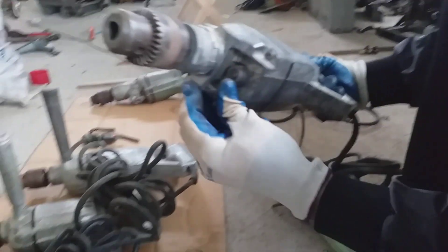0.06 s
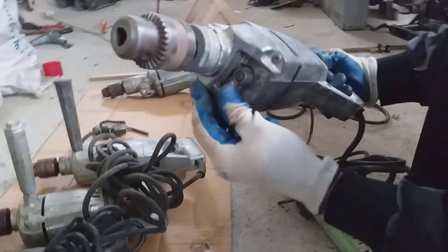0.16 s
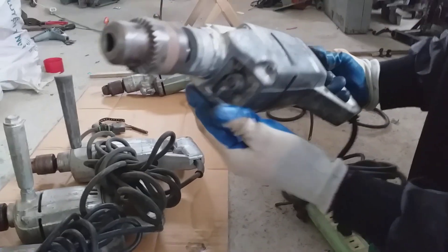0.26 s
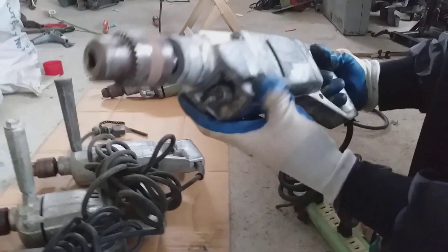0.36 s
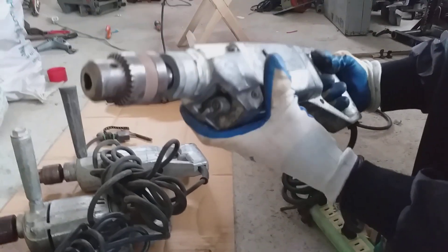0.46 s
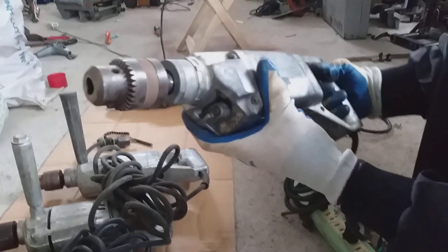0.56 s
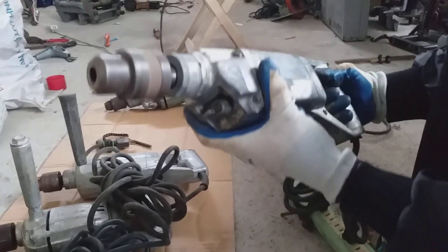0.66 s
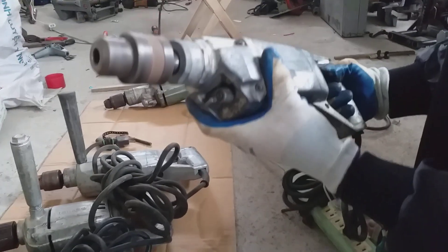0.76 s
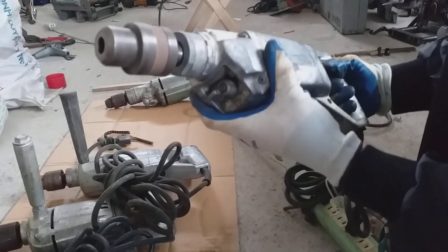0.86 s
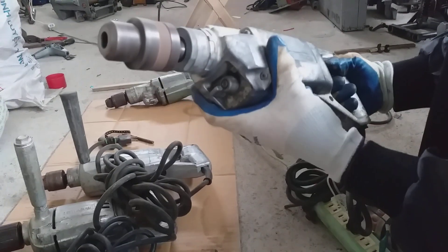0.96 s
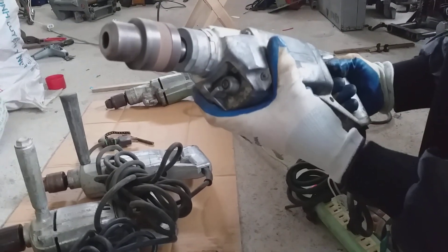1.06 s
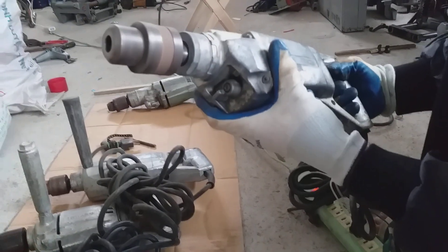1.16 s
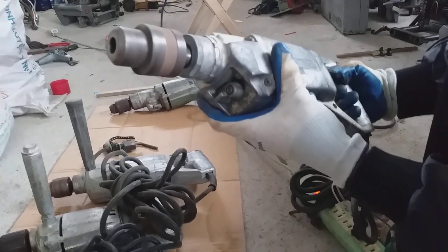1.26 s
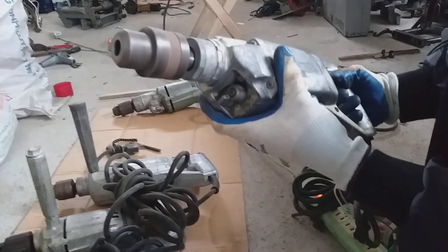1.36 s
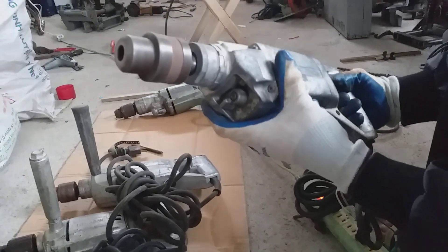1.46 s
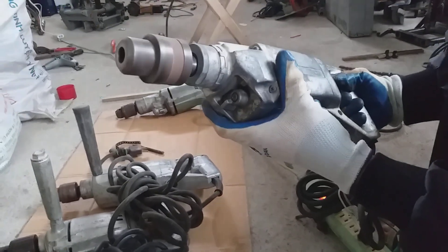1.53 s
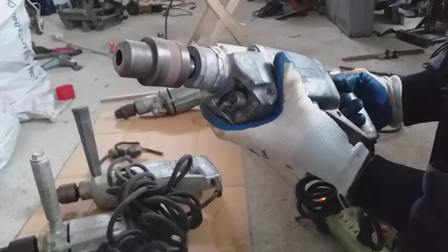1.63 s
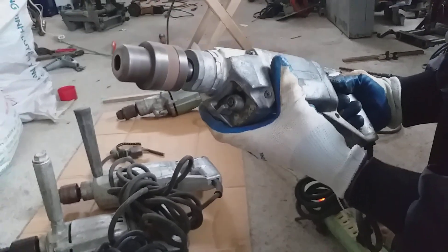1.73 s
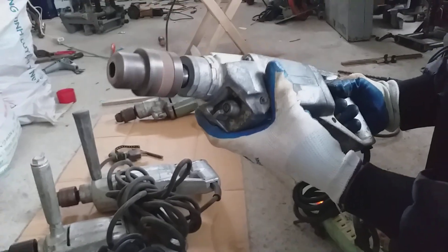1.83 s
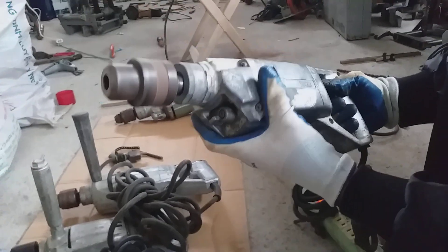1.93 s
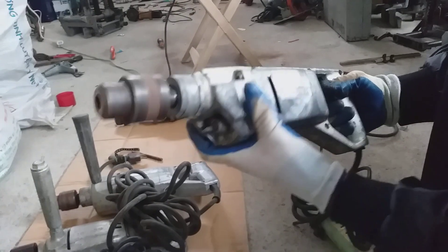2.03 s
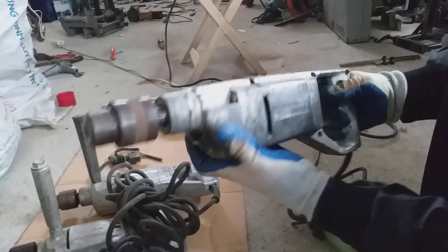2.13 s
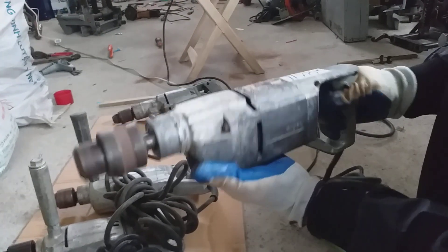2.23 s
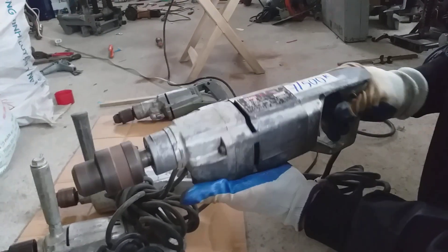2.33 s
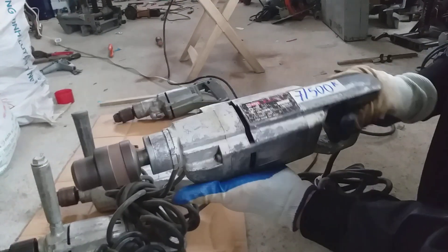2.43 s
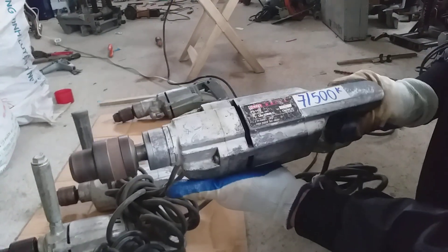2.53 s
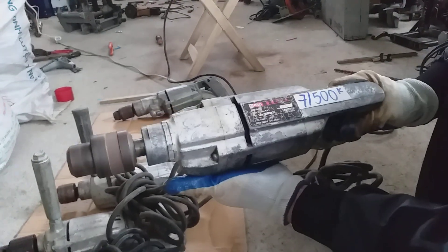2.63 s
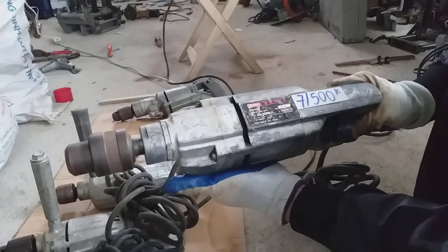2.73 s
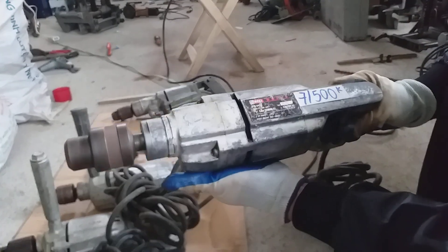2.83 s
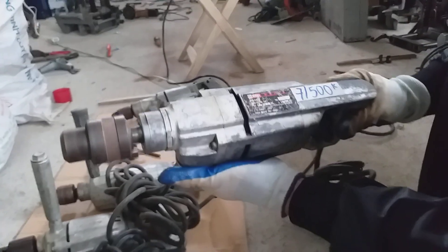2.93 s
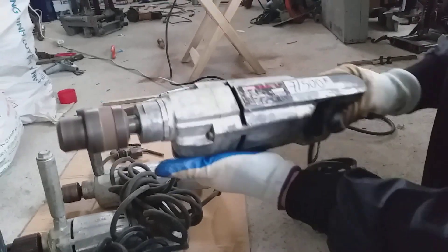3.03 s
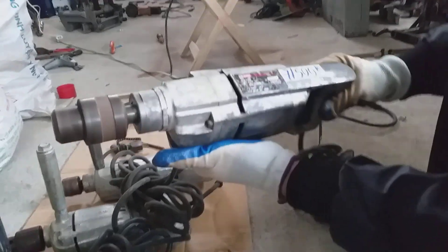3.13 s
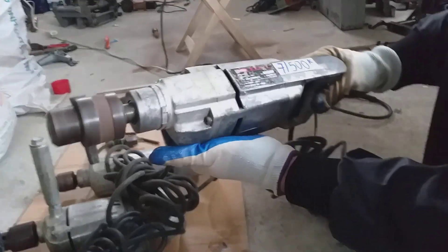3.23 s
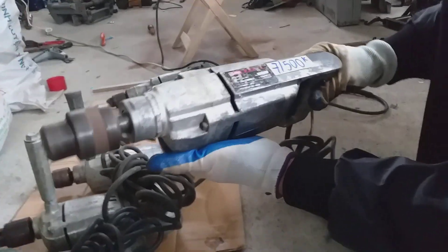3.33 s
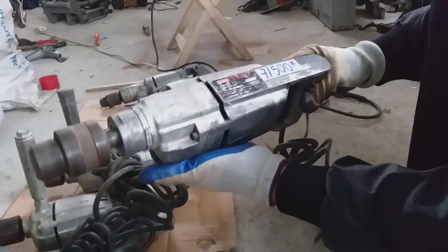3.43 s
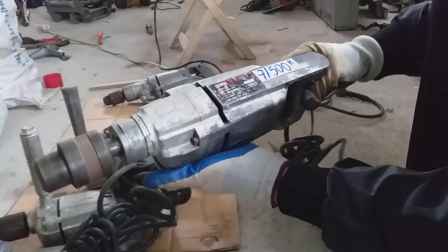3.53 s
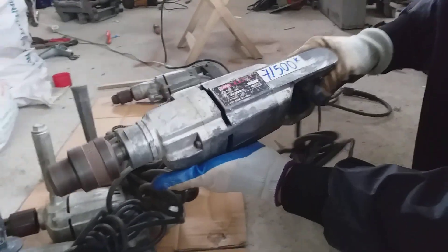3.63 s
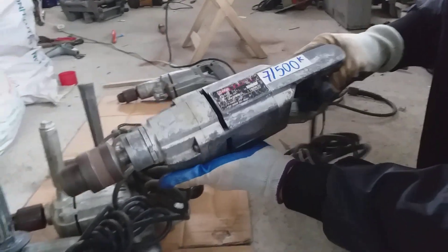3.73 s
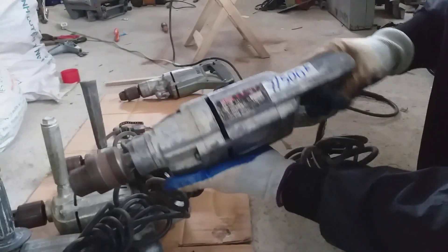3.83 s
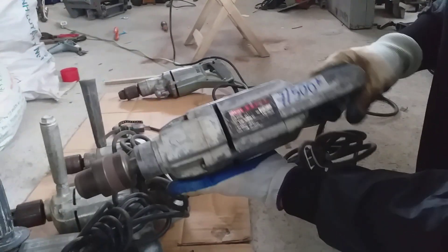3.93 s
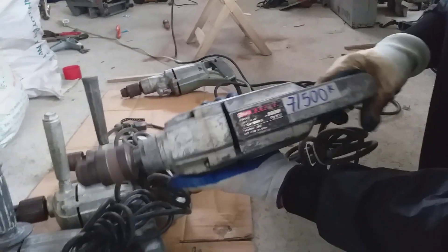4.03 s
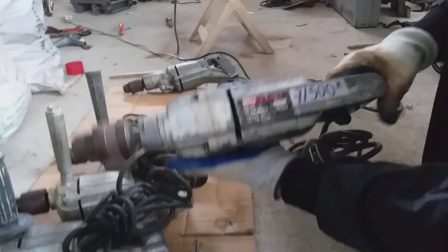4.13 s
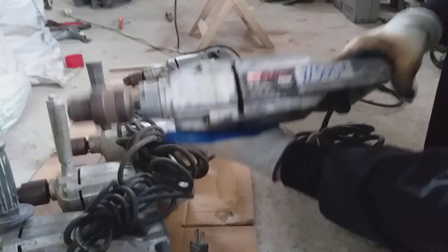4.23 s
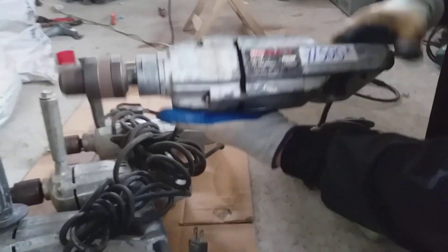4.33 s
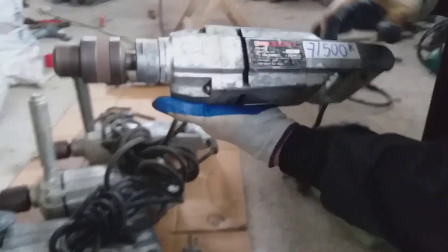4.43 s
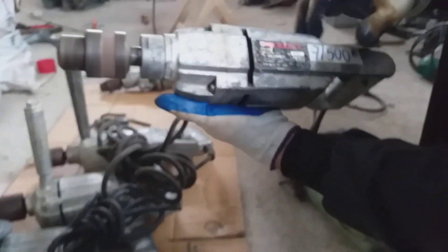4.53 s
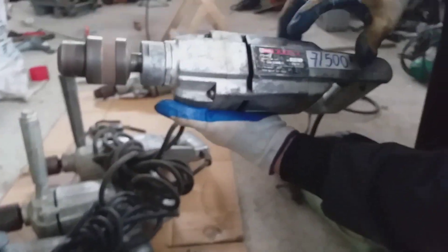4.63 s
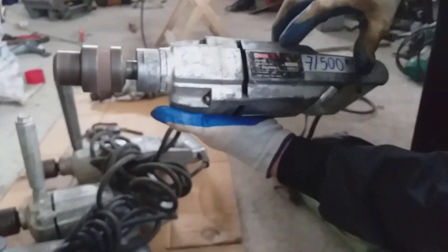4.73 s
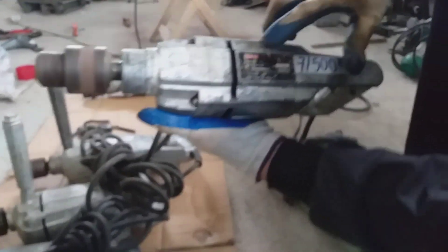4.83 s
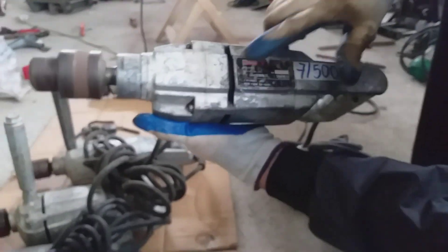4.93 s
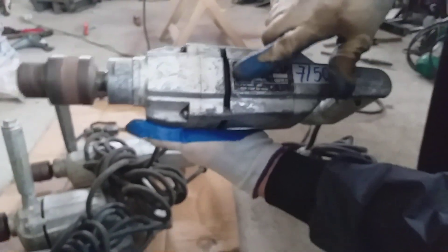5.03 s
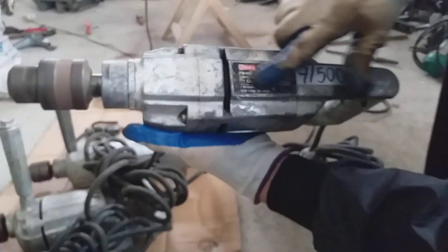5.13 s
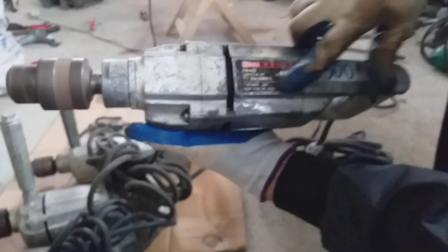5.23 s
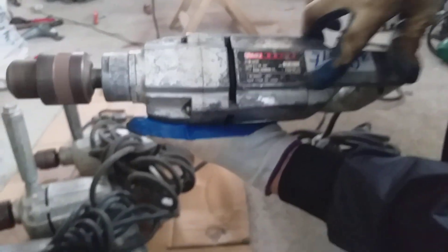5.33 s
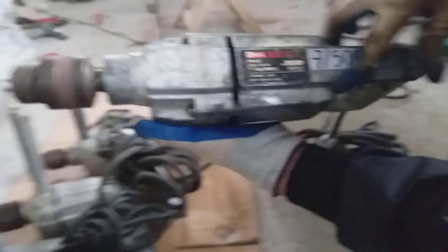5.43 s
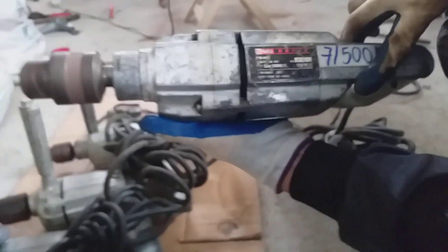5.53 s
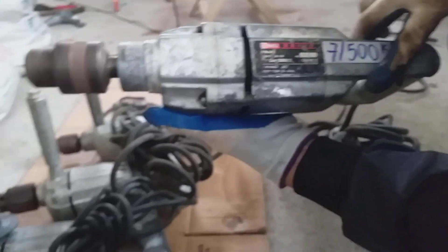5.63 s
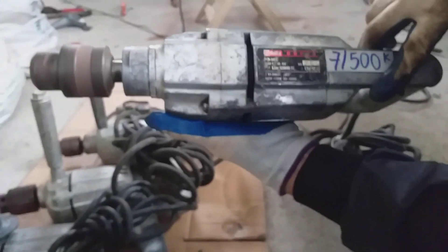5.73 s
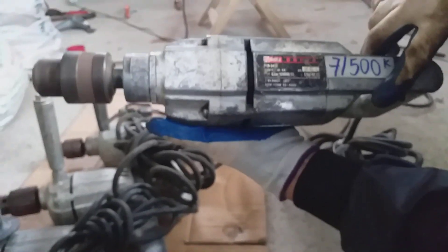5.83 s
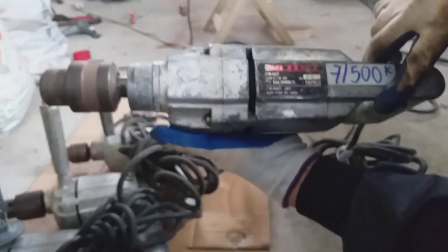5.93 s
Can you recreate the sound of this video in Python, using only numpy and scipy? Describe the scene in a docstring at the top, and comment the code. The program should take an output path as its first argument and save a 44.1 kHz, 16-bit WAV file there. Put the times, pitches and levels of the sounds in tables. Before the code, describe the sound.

A quiet workshop with faint steady room noise. In the first half second, coated gloves make small grainy rubs on metal, and a hand rumbles low on the microphone. At 0.6 s a trigger snaps sharply, ringing the metal housing, and an old corded drill jerks into motion: gears growl and throb, pitch sweeping up quickly within about half a second. It settles to a high, slightly fluttering fan whine over a loud rush of air and fine brush hiss. Around 2.1-2.3 s the drill is turned over; the whine swells briefly and the air changes colour. At 2.8 s power is released. The whine weakens and glides downward, its level wavering, while air gives way to dry, granular gear rattle that keeps slowing until the end near 6 s, still turning. Soft handling rumble returns from 4 s, with dull grip thumps around 4.8-5.2 s. Close, mono, little reverberation.

```python
"""Gloves rustle in a workshop while a hand rumbles on the microphone, in grainy noise and soft bass noise.
Then the trigger of an old corded drill snaps, a short noise burst that also rings the shell. The gears strain
as the motor runs up, and the twelve-bladed fan whines in sine tones over a noisy rush of air and brush hiss.
The drill is turned over, which changes the colour of the air, then released: it coasts down with rattling
gears, made of single tooth knocks. Grip bumps and handling rumble go on to the end."""
import sys
import numpy as np
from scipy import signal
from scipy.fft import rfft, irfft, next_fast_len
from scipy.io import wavfile
from scipy.ndimage import uniform_filter1d, minimum_filter1d, map_coordinates

SR = 44100
rng = np.random.default_rng(int(sys.argv[2]) if len(sys.argv) > 2 else 0)


def log_audio(samples):
    """Write samples as a 16-bit WAV file to the path given in sys.argv[1]."""
    # one column per channel
    frames = np.atleast_2d(samples).T
    # limit to full scale, then quantise
    limited = np.clip(frames, -1, 1)
    pcm = np.round(limited * 32767).astype(np.int16)
    wavfile.write(sys.argv[1], SR, pcm)


N = 263894
TIME = np.arange(N) / SR  # seconds
BLADES, TEETH, BARS = 12, 14, 24  # fan blades, pinion teeth, commutator bars
POWER_ON, BREAKAWAY, POWER_OFF = 0.599, 0.6224, 2.784  # switch closes, rotor breaks free, switch opens (s)
FULL_SPEED = 380  # turns per second

# The motor, in turns per second gained or lost each second:
# pull at standstill, bearing friction, fan drag at full speed.
STALL_PULL, FRICTION, FAN_DRAG = 8987, 48.97, 141.93
PULL_FADE = 98.98  # rise in turns per second over which the pull falls to 1/e
CREEP = 70  # turns per second while the gears take up their slack


def shaft_rate():
    """Turns per second: pull fades with speed until it balances friction and fan drag, which then brake."""
    rate, step = np.linspace(0, 400, 40001, retstep=True)
    drag = FRICTION + FAN_DRAG * (rate / FULL_SPEED) ** 2
    pull = STALL_PULL * np.exp(-rate / PULL_FADE)
    gain = np.maximum(pull - drag, 1e-3)
    rising = np.interp(TIME, BREAKAWAY + np.cumsum(step / gain), rate)
    # seconds of coasting left at each rate, so the fall starts from the speed at release
    to_rest = np.cumsum(step / drag)
    rate_at_release = np.interp(POWER_OFF, TIME, rising)
    stop = POWER_OFF + np.interp(rate_at_release, rate, to_rest)
    falling = np.interp(stop - TIME, to_rest, rate)
    return np.where(TIME < POWER_OFF, np.maximum(rising, CREEP), falling) * (TIME > POWER_ON)


def surge(peak_s, sharp):
    """Strain of the run-up: rises to 1 at peak_s after the switch closes, then dies away."""
    age = np.maximum(TIME - POWER_ON, 0) / peak_s
    return (age * np.exp(1 - age)) ** sharp


def torque_throb(depth):
    """Torque pulses twice per mains cycle, hardest while the starting current flows."""
    age = np.maximum(TIME - POWER_ON, 0)
    current = (0.036 + np.exp(-age / 0.25)) * (TIME < POWER_OFF)
    mains = 2 * np.pi * 50 * age  # 50 Hz mains
    throb = depth * current
    pulses = 1 + throb * (np.cos(2 * mains) + 0.31 * np.cos(mains))
    return pulses / np.sqrt(1 + throb ** 2 / 2)


# How far the drill is turned over. Each row: time in seconds, share of the top side facing the microphone.
TURN_OVER = [(2.05, 0), (2.3, 0.91)]


def top_facing():
    """Share of the drill's top side that faces the microphone."""
    return curve(TURN_OVER)


RIPPLE_HZ, RIPPLE_DB = 170.4, 1.95  # spacing of the random points along frequency, and their spread


def standing_waves(hz):
    """Standing waves make a gliding tone rise and fall randomly (dB) as its frequency moves."""
    place = hz / RIPPLE_HZ
    return RIPPLE_DB * map_coordinates(rng.standard_normal(512), [place], mode='mirror')


# The blade tone swells and fades as the vents turn.
# Each row: time in seconds, level in dB before a small lift, ripple and wobble.
BLADE_TONE = [(0.64, -42), (0.71, -15.5), (0.77, -25), (0.86, -16), (1.12, -11), (1.55, -8.5), (1.93, -13),
              (2.1, -13), (2.23, -2.5), (2.55, -16), (2.8, -16.5), (2.85, -34.9), (2.92, -18.5),
              (3.18, -18), (3.28, -29.5), (3.34, -23), (3.39, -35), (3.5, -23), (3.62, -21), (3.7, -27.5),
              (3.78, -25), (4.7, -42), (5.04, -33.5), (5.98, -43)]
# Overtones of the blade tone, from the 2nd up.
# Each row: dB at full speed, dB lost toward standstill, dB gained in the run-up.
BLADE_OVERTONES = [(4.5, 26, 13), (-1.5, 0.5, -6), (-7, 8.5, 3), (-13, 6, 6)]
# How well the vents radiate the overtones. Each row: frequency in Hz, gain in dB.
VENT_RADIATION = [(2000, -38), (3300, -42), (4200, -30), (5100, -28), (5700, -43), (6500, -31), (7500, -26),
                  (8100, -37), (9200, -45), (10300, -36), (11100, -39), (12400, -33.5), (13300, -39),
                  (15500, -36)]


def fan(turns, speed):
    """Blades chop the air into a whine; the shaft flutters, most around the start."""
    flutter = 0.077 + 0.49 * np.exp(-np.abs(TIME - POWER_ON) / 0.27)
    phase = 2 * np.pi * BLADES * turns + flutter * wobble(70)
    blade_hz = BLADES * FULL_SPEED * speed
    gliding = np.sqrt(1 - speed)
    whine_db = curve(BLADE_TONE) + 0.34 + gliding * standing_waves(blade_hz) + 0.74 * wobble(35)
    tones = amp(whine_db) * np.sin(phase)
    for k, (full_db, slow_db, strain_db) in enumerate(BLADE_OVERTONES, 2):
        db = np.interp(k * blade_hz, *np.transpose(VENT_RADIATION))
        db += gliding * standing_waves(k * blade_hz)
        db += full_db - slow_db * (1 - speed) + strain_db * surge(peak_s=0.29, sharp=5.0)
        db += 2.7 * wobble(9) + 0.94 * wobble(35)
        audible = k * blade_hz < SR / 2
        tones += amp(db) * np.sin(k * phase) * audible
    return np.sqrt(2) * tones


def gear_tone(turns, running_db, jerk_db, settling_db, octave_db):
    """The pinion sings at its tooth rate: strong at the first jerk, shaken by the torque pulses."""
    driven = np.clip((POWER_OFF - TIME) / 0.25 + 1, 0, 1) * (TIME > POWER_ON)
    mesh = amp(running_db + 1.6 * wobble(5.4)) * driven
    mesh += amp(jerk_db) * surge(peak_s=0.125, sharp=3.5)
    mesh += amp(settling_db) * surge(peak_s=0.29, sharp=3.5)
    octave = amp(octave_db) * surge(peak_s=0.073, sharp=11.6)
    phase = 2 * np.pi * TEETH * turns + 0.44 * wobble(160)
    return np.sqrt(2) * torque_throb(depth=2.2) * (mesh * np.sin(phase) + octave * np.sin(2 * phase))


def armature(turns, speed, hum_db, strain_db):
    """The rotor's imbalance hums once per turn, more in the run-up and less with the top facing."""
    db = hum_db + strain_db * surge(peak_s=0.18, sharp=1.5) - 5.5 * top_facing() + 1.8 * wobble(10)
    return amp(db) * speed ** 1.2 * np.sin(2 * np.pi * turns)


# The drill drifts nearer and farther. Each row: time in seconds, change of the running noise in dB.
DISTANCE = [(2.6, 0), (2.9, 1.4), (3.3, -0.34), (4.2, -1), (4.7, 0.5), (5.2, 1.5), (5.98, -0.1)]


def layer_db(layer, speed, steepness, strain):
    """A noise layer grows with speed and strain, and changes as the drill is rolled and moved."""
    crawl_db, full_db, strain_db, top_db = layer
    db = crawl_db + (full_db - crawl_db) * speed ** steepness
    return db + strain_db * strain + top_db * top_facing() + curve(DISTANCE)


# Colour of the air with the drill's side toward the microphone. Each row: frequency in Hz, relative dB.
SIDE_AIR = [(60, -43), (250, -19.5), (480, -14), (650, -6.5), (1000, -5), (1950, -5.5), (2500, 1),
            (3100, -8), (3900, 2.5), (6000, -2.5), (7400, 1), (8600, -18.5), (10500, -39)]
# Colour of the air with its top toward the microphone. Each row: frequency in Hz, relative dB.
TOP_AIR = [(100, -43), (480, -13), (750, -7.5), (1300, 3.5), (1700, -5), (2050, 0.5), (2650, -2), (4150, 3),
           (4800, 3), (5300, 8.5), (6100, 1.5), (7400, 3.5), (8600, -14), (10500, -39)]
# Colour of the gear rattle. Each row: frequency in Hz, relative dB.
GEAR_COLOUR = [(60, -25.5), (400, -19), (650, -3), (820, -8.5), (930, 2), (1080, -5.5), (1380, -1),
               (1850, -3.5), (2700, -1.5), (4300, 1.5), (5400, -2.5), (7400, -0.5), (8500, -16),
               (10500, -50)]
# The bright rush and the low roar of the running noise, before small trims where they are played.
# Each is one row: dB at a crawl, dB at full speed, dB gained in the run-up, dB gained with the top facing.
AIR_RUSH = (-26.5, -18, 9.5, -2.5)
LOW_ROAR = (-35.5, -31, 8, .5)
# gear share of the noise at a crawl and at full speed, before strain; share of full speed where air takes over
RATTLE_SLOW, RATTLE_FAST, AIR_TAKES_OVER = 0.93, 0.15, 0.72


def running_noise(turns, speed):
    """Air rushes from the vents at speed; as the drill slows, the rattle in the gearbox is left."""
    rush_db = layer_db(AIR_RUSH, speed, steepness=2.5, strain=surge(peak_s=0.072, sharp=0.32))
    roar_db = layer_db(LOW_ROAR, speed, steepness=1.13, strain=surge(peak_s=0.14, sharp=0.63))
    roar_db -= 7 * np.exp(-np.abs(TIME - POWER_ON) / 0.018)  # softer right around the switch-on
    air = blend(amp(3.0) * noise(SIDE_AIR), amp(3.5) * noise(TOP_AIR), top_facing())

    knocks = contacts(turns, count=TEETH, wear=0.22, scatter_db=4.0)
    knocks = blend(knocks, rng.standard_normal(N), share=0.52)
    ringing = shell(contacts(turns, count=TEETH, wear=0.31, scatter_db=1.0))
    gears = amp(1.5) * blend(colour(knocks, GEAR_COLOUR), ringing, share=0.089 + 0.45 * (1 - speed))
    gears *= amp(0.4 * wobble(45) + 0.84 * wobble(10))

    rattle = RATTLE_FAST + (RATTLE_SLOW - RATTLE_FAST) / (1 + (speed / AIR_TAKES_OVER) ** 15)
    # under strain the teeth stay pressed together and rattle less
    rattle *= 1 - 0.55 * surge(peak_s=0.11, sharp=0.3)
    mix = drifting(blend(air, gears, rattle), depth_db=0.94) * torque_throb(depth=0.18)
    mix *= amp(0.73 * wobble(220))
    # the low roar spreads evenly, while the treble beams from the vents
    low = filtered(mix, lambda hz: 1 / (1 + (hz / 1700) ** 6))
    rush = amp(rush_db + 0.3 * wobble(25.3)) * (mix - low)
    return rush + amp(roar_db - 1.1) * unit(low)


WHEEL_HZ, WHEEL_WIDTH_HZ = 3254, 290  # ring of the big gear wheel, and the width of its resonance


def gear_wheel(turns, speed, crawl_db, jerk_db):
    """At low speed the backlash keeps the big gear wheel ringing unevenly, hardest at the first jerk."""
    def resonance(f):
        width = 1j * f * WHEEL_WIDTH_HZ
        return (width / (WHEEL_HZ ** 2 - f * f + width)) ** 2

    knocks = contacts(turns, count=TEETH, wear=0.17, scatter_db=0.5) * amp(1.8 * wobble(90))
    ring = unit(filtered(knocks, resonance))
    db = crawl_db + jerk_db * surge(peak_s=0.031, sharp=1.7)
    return amp(db) * np.exp(-(speed / 0.36) ** 3) * ring


# Colour of the brush noise. Each row: frequency in Hz, relative dB.
BRUSH_COLOUR = [(7000, -14), (8600, -9), (9500, -4.5), (11000, 0.5), (12100, -1), (13000, -0.5),
                (15800, -2)]
# The hiss is beamed, so it changes with the aim of the drill.
# Each row: time in seconds, level in dB before a fixed lift of 1.6 dB and the torque throb.
BRUSH_HISS = [(0.62, -33), (0.77, -30.5), (1.56, -30), (2.11, -28), (2.23, -28), (2.98, -29), (3.29, -35),
              (3.34, -34), (3.6, -36), (4.1, -40.5), (5.5, -34.5), (5.98, -36.5)]


def brushes(turns):
    """Carbon brushes hiss under power; coasting, they tick over the same commutator bars each turn."""
    ticks = contacts(turns, count=BARS, wear=1.3, scatter_db=2)
    coasting = np.clip((TIME - POWER_OFF) / 1.2, 0, 1)
    scrape = blend(rng.standard_normal(N), ticks, share=0.052 + 0.5 * coasting)
    scrape = drifting(colour(scrape, BRUSH_COLOUR), depth_db=1.0)
    scrape *= amp(wobble(400) + 0.62 * wobble(30))
    return amp(curve(BRUSH_HISS) + 1.6) * unit(scrape) * torque_throb(depth=0.2)


# The switch closing. Each row: start in seconds, level in dB of the snap before its envelope.
SWITCH_CLOSING = [(0.5978, -15.5)]
# Colour of the snap. Each row: frequency in Hz, relative dB.
SNAP_COLOUR = [(300, -30), (1000, -13), (2200, -9), (3600, 3), (5000, -5), (6500, -2), (9000, -22),
               (15800, -18)]


def trigger():
    """The switch snaps shut and the shell rings briefly."""
    out = np.zeros(N)
    for start, db in SWITCH_CLOSING:
        age = np.maximum(TIME - start, 0)
        snap = blend(shell(rng.standard_normal(N)), noise(SNAP_COLOUR), share=0.91)
        envelope = np.exp(-(age / 0.0037) ** 4) + 0.4 * amp(-60 * age / 0.13)
        out += (TIME > start) * amp(db) * snap * envelope
    return out


# Glove rubs. Each row: middle in seconds, level in dB, spread to either side in seconds.
GLOVE_RUBS = [(0.177, -47, 0.0091), (0.252, -51.5, 0.084), (0.279, -38, 0.003), (0.326, -40, 0.014),
              (0.38, -53, .018)]


def gloves():
    """Coated gloves slide on the housing: grainy noise under bell-shaped swells."""
    rubs = sum(amp(db) * np.exp(-0.5 * ((TIME - s) / spread) ** 2) for s, db, spread in GLOVE_RUBS)
    grain = amp(2.5 * wobble(700))
    rustle = noise([(400, -19), (2000, -7.5), (3800, 2.0), (7200, 1), (8800, -15), (12000, -9.5), (15800, -9)])
    return rubs * unit(grain * rustle)


# The hand slides on the microphone's body.
# Each row: start in seconds, length in seconds, level in dB before a cut of 2 dB.
HAND_SLIDES = [(0.009, 0.043, -50), (0.077, 0.18, -45.5), (0.357, 0.12, -42.5), (0.526, 0.2, -44),
               (0.801, 0.17, -46), (1.246, 0.036, -42), (1.306, 0.17, -39), (1.703, 0.12, -44),
               (3.993, 0.17, -43), (4.164, 0.041, -44), (4.431, 0.092, -45), (4.608, 0.66, -37.5),
               (5.311, 0.23, -47), (5.822, 0.048, -44.5)]
# Grip shifts. Each row: start in seconds, level in dB before the thump's rise and decay.
GRIP_BUMPS = [(1.33, -25), (1.426, -30), (1.722, -26), (4.063, -22), (4.603, -32), (4.83, -12),
              (4.934, -12), (5.01, -14.5), (5.223, -18)]
# Bass colour of the hand's rumble. Each row: frequency in Hz, relative dB.
HAND_COLOUR = [(15, -52), (25, -26), (64, -1), (103, 3), (157, -3), (287, -17), (330, -10.5), (430, -61),
               (730, -120)]
HOLD_DB = -69  # rumble of the hand at rest


def handling():
    """The grip on the microphone rumbles and bumps, all in the bass."""
    slides = sum(amp(db) * np.exp(-(np.abs(TIME - start - length / 2) / (0.54 * length)) ** 3)
                 for start, length, db in HAND_SLIDES)
    rumble = (amp(HOLD_DB) + amp(-2.0) * slides) * amp(2.4 * wobble(28)) * noise(HAND_COLOUR)
    pitches = 135 * np.exp(rng.normal(0, 0.47, len(GRIP_BUMPS)))  # Hz, scattered by chance
    for (start, db), hz in zip(GRIP_BUMPS, pitches):
        age = np.maximum(TIME - start, 0)
        envelope = amp(db - 60 * age / 0.038) * (1 - np.exp(-age / 0.004))
        rumble += envelope * np.sin(2 * np.pi * hz * age)
    return rumble


def workshop(x, t60):
    """A short diffuse answer from floor and walls: noise that falls 60 dB in t60 seconds."""
    t = np.arange(SR // 2) / SR
    tail = rng.standard_normal(len(t)) * amp(-60 * t / t60) * (t > 0.005)
    return signal.fftconvolve(x, tail / np.linalg.norm(tail))[:N]


# Colour of the quiet workshop. Each row: frequency in Hz, relative dB.
ROOM_COLOUR = [(120, -29), (200, -5.5), (328, -0.5), (455, -9.5), (644, -3.5), (746, -8), (946, -7),
               (1930, -10.5), (2730, -10), (6940, -8.5), (8640, -23), (15800, -25)]


def background(level_db):
    """The workshop's own steady noise."""
    return amp(level_db) * noise(ROOM_COLOUR)


# Resonances of the cast metal shell. Each row: frequency in Hz, width in Hz, relative dB.
SHELL_MODES = [(927, 280, -2), (2110, 45, -5), (3287, 57, 8.5), (4350, 160, 7.5), (5030, 390, 5),
               (5470, 17, 11), (5830, 230, 3.5), (6440, 190, 4), (7180, 190, -6), (7600, 33, -9),
               (10570, 140, -13), (11900, 340, -17)]


def shell(x):
    """Ring the housing's resonances, with alternating sign, to rms 1."""
    def response(f):
        total = 0
        for k, (centre, width, db) in enumerate(SHELL_MODES):
            damping = 1j * f * width
            total = total + (-1) ** k * amp(db) * damping / (centre * centre - f * f + damping)
        return total

    return unit(filtered(x, response))


def contacts(turns, count, wear, scatter_db):
    """Count contacts a turn, each pushing or pulling by chance; uneven wear repeats a pattern each turn."""
    number = np.arange(1, int(turns[-1] * count))
    at = np.clip(np.interp(number / count, turns, np.arange(N)), 8, N - 10)  # position in samples
    worn = rng.standard_normal(count)
    pattern = wear * unit(worn - worn.mean())[number % count]
    chance = rng.standard_normal((len(number), 2))
    size = pattern + np.sign(chance[:, 0]) * amp(scatter_db * chance[:, 1])
    # a short windowed sinc places each knock between samples
    taps = at.astype(int)[:, None] + np.arange(-7, 9)
    offset = taps - at[:, None]
    knocks = size[:, None] * np.sinc(offset) * np.sinc(offset / 8)
    train = np.bincount(taps.ravel(), knocks.ravel(), N)
    # even out the loudness over 0.2 s
    return train / np.sqrt(np.abs(uniform_filter1d(train ** 2, SR // 5)) + 1e-4)


def drifting(x, depth_db):
    """The colour shifts in patches as the hand-held drill moves above the floor."""
    z = signal.stft(x, nperseg=512)[2]
    field = uniform_filter1d(rng.standard_normal(z.shape), size=4, axis=0)
    field = uniform_filter1d(field, size=70, axis=1)
    return signal.istft(z * amp(depth_db * unit(field)), nperseg=512)[1][:N]


def amp(db):
    """Decibels to gain."""
    return 10 ** (np.asarray(db) / 20)


def unit(x):
    """Scale to rms 1."""
    return x / np.sqrt(np.mean(x ** 2) + 1e-20)


def curve(rows):
    """One value per sample, drawn in straight lines through rows of time and value."""
    return np.interp(TIME, *np.transpose(rows))


def wobble(rate):
    """A smooth random curve, rate knots a second."""
    return map_coordinates(rng.standard_normal(int(N * rate / SR) + 4), [TIME * rate])


def filtered(x, response):
    """x times a response of frequency."""
    m = next_fast_len(N + SR // 2)
    return irfft(rfft(x, m) * response(np.fft.rfftfreq(m, 1 / SR)), m)[..., :N]


def colour(x, points):
    """Shape x by (Hz, dB) points on a log axis, to rms 1."""
    f, db = np.transpose(points)
    return unit(filtered(x, lambda hz: amp(np.interp(np.log(hz + 1), np.log(f), db))))


def noise(points):
    """Fresh coloured noise of rms 1."""
    return colour(rng.standard_normal(N), points)


def blend(a, b, share):
    """Equal-power fade from a to b."""
    share = np.clip(share, 0, 1)
    return np.sqrt(1 - share) * a + np.sqrt(share) * b


def limiter(x, ceiling, size):
    """The gain dips just enough to hold every peak under the ceiling, smoothed over size samples."""
    needed = np.minimum(1, ceiling / (np.abs(x).max(axis=0) + 1e-9))
    return x * uniform_filter1d(minimum_filter1d(needed, size), size)


def scene():
    """Every part of the drill follows the one shaft; both channels carry the same sound."""
    rate = shaft_rate()
    turns, speed = np.cumsum(rate) / SR, rate / rate.max()
    spinning = np.clip((TIME - 0.606) / 0.021, 0, 1)  # fade-in of the moving parts
    tones = fan(turns, speed)
    tones += gear_tone(turns, running_db=-36, jerk_db=-19, settling_db=-23.5, octave_db=-11)
    tones += armature(turns, speed, hum_db=-43.5, strain_db=7)
    rasp = running_noise(turns, speed) + brushes(turns)
    rasp += gear_wheel(turns, speed, crawl_db=-32.0, jerk_db=15.5)
    drill = spinning * (tones + rasp) + trigger() + gloves()
    mono = drill + amp(-16.5) * workshop(drill, t60=0.49) + handling() + background(level_db=-52.0)
    return np.array([mono, mono])


TOP_HZ = 15820  # band limit


def record(dry):
    """A fast limiter holds the peaks; the deepest bass and all above the band limit are cut."""
    held = limiter(dry, ceiling=0.89, size=88)
    return filtered(held, lambda hz: (hz < TOP_HZ) / (1 + (42 / (hz + 1)) ** 5))


dry = scene()
out = record(dry)
log_audio(out)
```